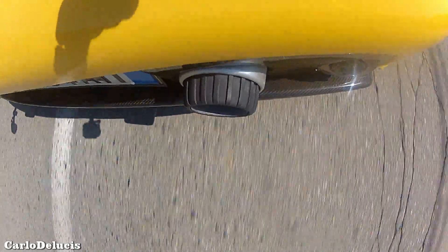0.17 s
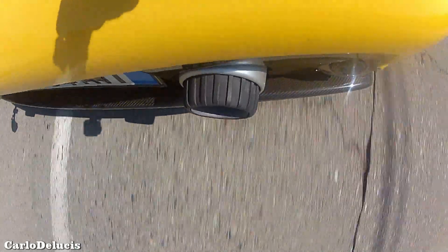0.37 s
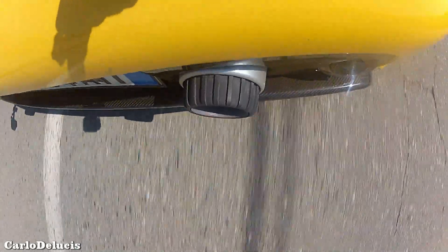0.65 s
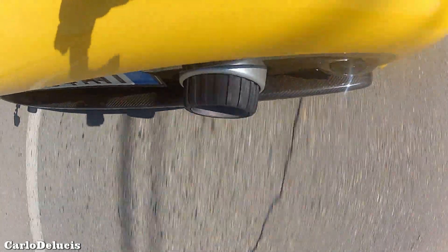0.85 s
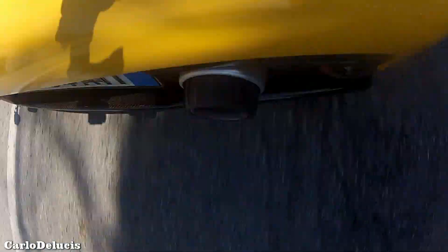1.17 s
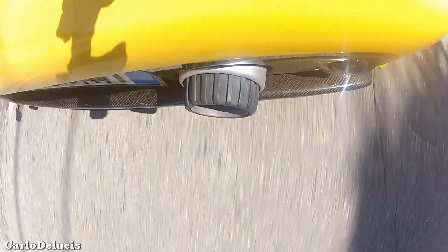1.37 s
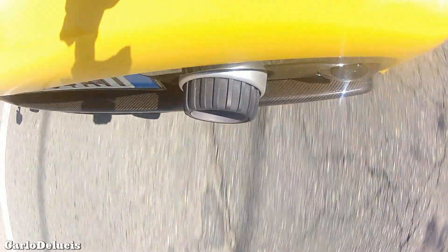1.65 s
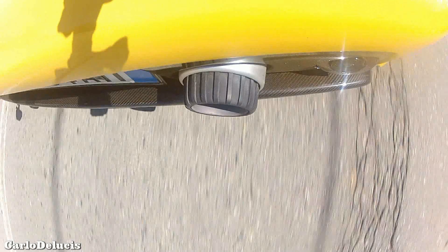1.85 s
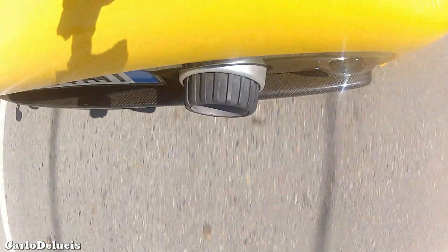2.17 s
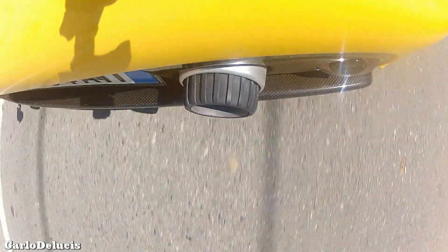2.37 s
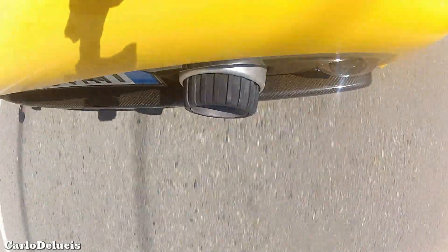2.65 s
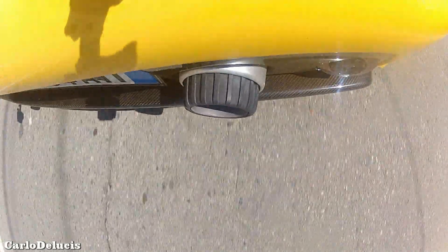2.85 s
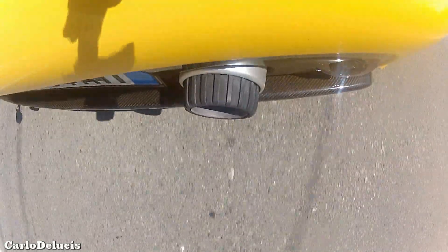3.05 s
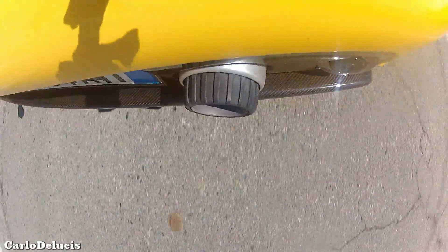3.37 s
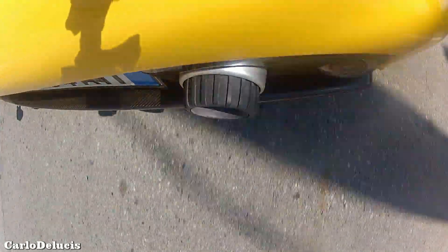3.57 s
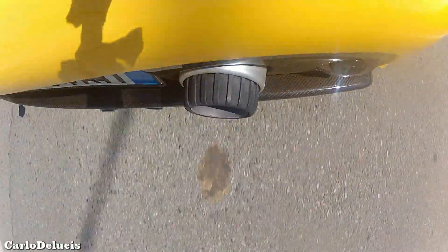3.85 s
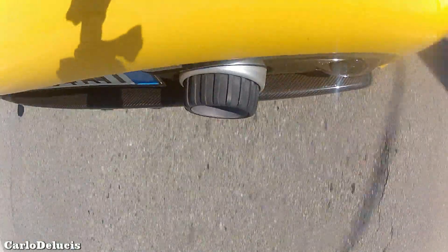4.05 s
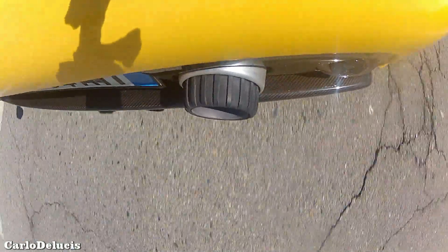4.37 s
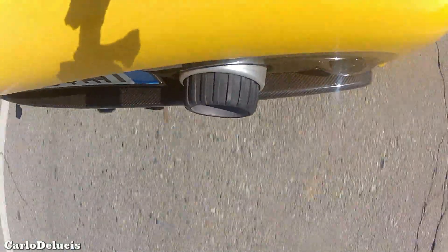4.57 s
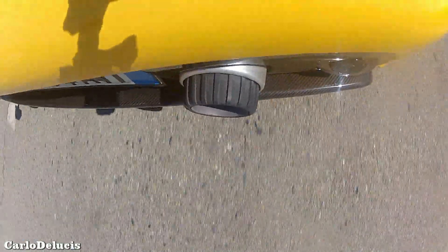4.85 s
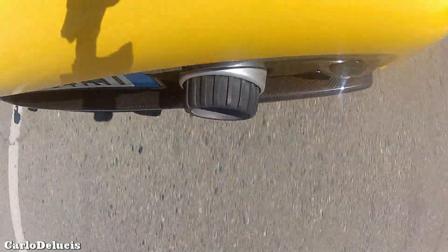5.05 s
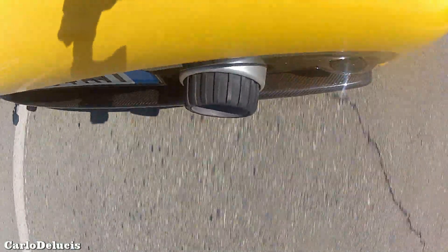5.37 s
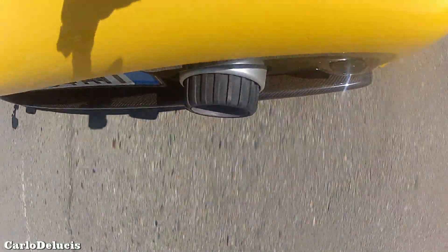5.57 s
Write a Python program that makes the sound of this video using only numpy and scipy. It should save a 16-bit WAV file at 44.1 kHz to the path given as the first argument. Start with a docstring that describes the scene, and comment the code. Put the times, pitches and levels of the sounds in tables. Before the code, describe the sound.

Right above a sports car's tailpipe on an open road, a small overloaded camera microphone catches a high, steady engine howl with brief dips in pitch. The throttle shuts, the note slides down into burbling and heavy pops with wind buffeting, booms in a low drone, then rasps hard and climbs again. Dull highs carry a metallic digital sizzle.

```python
"""Just above the exhaust of a V10 sports car, at a small camera's microphone: the engine pulls at high revs,
winds down, burbles and pops with the throttle shut, drones on a pipe resonance, then rasps and pulls again.
Sine waves tied to the crank make the note; shaped noise makes burble, gas jet and wind.
Pops ring the pipe; decaying sines make low thumps of wind and exhaust at the microphone.
The recorder overloads softly and holds each sample, which adds a metallic sizzle."""
import sys
import numpy as np
from scipy import signal
from scipy.fft import rfft, irfft, next_fast_len
from scipy.io import wavfile
from scipy.ndimage import map_coordinates

SR = 44100
rng = np.random.default_rng(int(sys.argv[2]) if len(sys.argv) > 2 else 0)


def store_wav(level_fs):
    """Save 16-bit WAV to argv[1]."""
    pcm = np.round(np.clip(np.atleast_2d(level_fs), -1, 1) * 32767)
    wavfile.write(sys.argv[1], SR, pcm.T.astype(np.int16))


N = 252252  # length in samples


def amp(db):
    """Turn decibels into a gain."""
    return 10 ** (np.asarray(db) / 20)


def unit(x):
    """Scale to an rms of 1."""
    return x / np.sqrt(np.mean(x ** 2) + 1e-20)


def along(points, hz):
    """Read a table of frequency and value on a logarithmic frequency axis."""
    f, v = np.transpose(points)
    return np.interp(np.log(hz + 1), np.log(f + 1), v)


def curves(rows):
    """Join the rows by straight lines: one value per sample for each column after the time."""
    s, *cols = np.transpose(rows)
    return [np.interp(np.arange(N) / SR, s, c) for c in cols]


def wobble(rate):
    """A smooth random curve with `rate` random points a second."""
    knots = rng.standard_normal(int(N * rate / SR) + 4)
    return map_coordinates(knots, [np.arange(N) * rate / SR])


def filtered(x, response):
    """Multiply the spectrum of x by a response that depends on frequency."""
    m = next_fast_len(N + SR // 2)
    return irfft(rfft(x, m) * response(np.fft.rfftfreq(m, 1 / SR)), m)[:N]


def coloured(x, spectrum):
    """Shape x by a table of frequency and decibels, then scale to an rms of 1."""
    return unit(filtered(x, lambda hz: amp(along(spectrum, hz))))


def ring(spectrum, size=4096):
    """The ringing a sudden kick would give with this spectrum, starting at once, with a peak of 1."""
    cepstrum = irfft(np.log(amp(along(spectrum, np.fft.rfftfreq(size, 1 / SR)))))
    # folding the cepstrum onto its first half puts the energy as early as possible
    cepstrum[1:size // 2] *= 2
    cepstrum[size // 2 + 1:] = 0
    h = irfft(np.exp(rfft(cepstrum)))
    return h / np.abs(h).max()


# how far the throttle is open: time_s, load (0 to 1)
THROTTLE_LOAD = [(0, 0.49), (.28, 0.6), (.37, 0.2), (.46, 0.17), (.51, 0.83), (.92, 0.64), (1.25, 0.78),
                 (1.5, 0.17), (1.9, .05), (2.6, 0.2), (2.85, 0), (2.9, 0.07), (3.95, 0), (4.5, 0.27),
                 (4.7, 0.99)]


def throttle():
    """Throttle opening, from 0 (shut) to 1 (open), which decides how hard the engine works."""
    return np.clip(curves(THROTTLE_LOAD)[0], 0, 1)


# brief drops in the revs, which then catch again: bottom_s, depth_hz, recovery_s
REV_DIPS = [(.06, 15, 0.077), (.82, 27, 0.063), (1.22, 43, .15), (2.235, 17, 0.071)]
DIP_FALL_S = .055  # time to the bottom


def dip():
    """Hz by which the firing rate has dropped: a quick fall and then the recovery."""
    return sum(curves([(s - DIP_FALL_S, 0), (s, depth), (s + recovery, 0)])[0]
               for s, depth, recovery in REV_DIPS)


# engine speed through the first pull, the wind-down and the second pull, before dips: time_s, firing_hz
ENGINE_SPEED = [(0, 371.2), (.15, 375.9), (.33, 369.4), (.47, 383.8), (.56, 401), (1.06, 423.3),
                (1.17, 441.4), (1.37, 428.2), (1.65, 411.8), (1.85, 405.6), (2.18, 393.5), (2.32, 381.3),
                (2.4, 358.4), (2.55, 346.5), (2.84, 298.3), (3.56, 222.2), (3.84, 213.4), (4.02, 204.4),
                (4.41, 200.7), (4.46, 207.5), (4.51, 198.2), (4.85, 217), (5.35, 270.4), (5.44, 282.1),
                (5.54, 288.4), (5.72, 312.4)]


def crank(jitter):
    """Firing rate and firing phase; the crankshaft turns a little unevenly."""
    hz = curves(ENGINE_SPEED)[0] - dip()
    uneven_hz = hz * (1 + jitter * wobble(70))
    return hz, 2 * np.pi * np.cumsum(uneven_hz) / SR


# the pipe as the regular firings drive it: frequency_hz, level_db
PIPE_RESPONSE = [(100, -5), (200, 1), (430, 4), (750, 7), (880, -4.5), (1030, -25), (1200, -23),
                 (1350, -14.5), (1500, -36.5), (1720, -29.5), (1900, -34.5), (2120, -25.5), (2400, -37.5),
                 (3400, -53.5)]
# notes beside the firing note from unequal cylinders: multiple of the firing rate, level_db (re firing note)
UNEQUAL_CYLINDERS = [(.5, -19.5), (.8, -30), (.9, -41), (1.1, -14.5), (1.2, -17.5), (1.9, -24.5),
                     (2.1, -22)]
# a pipe resonance that lifts any overtone gliding through it
SECOND_MODE_HZ, SECOND_MODE_WIDTH_HZ, SECOND_MODE_DB = 458, 30.6, 12
DIP_DB_PER_HZ, DIP_RASP_DB_PER_HZ = 0.1, 0.19  # in a dip the firing note weakens, the upper overtones flare
# at part throttle the two banks differ most and their overtones snarl: load, load width, lift in dB
PART_LOAD, PART_LOAD_WIDTH, PART_LOAD_DB = 0.31, 0.071, 5.5
SHUT_FLUTTER = 2.7  # share by which the overtones flutter more with the throttle shut
WEAK_WAVER = .8  # the weaker the note, the more it breaks up: exponent of that growth


def note(rows, hz, phase, whole_db, throttle_db, bank_db, uneven_db, upper_db, upper_bank_db, flutter_db,
         waver_db, fade_s=0.021):
    """The clean engine note: all ten cylinders make whole multiples of the firing rate, two unequal banks
    make the halves between; the pipe colours these overtones as they glide."""
    t = np.arange(N) / SR
    gate = np.clip(np.minimum(t - rows[0][0], rows[-1][0] - t) / fade_s + 1, 0, 1)
    on = gate > 0
    load = throttle()[on]

    strength_db = curves(rows)[0]
    frailty = np.minimum(amp(WEAK_WAVER * (strength_db.max() - strength_db)), 5)
    waver = waver_db * frailty * wobble(32)
    first_db = (strength_db - DIP_DB_PER_HZ * dip() + waver)[on]

    def line(multiple, db):
        """A sine wave at a multiple of the firing rate, with its rms level in dB."""
        return np.sqrt(2) * amp(db) * np.sin(multiple * phase[on] + rng.uniform(0, 2 * np.pi))

    def pipe_db(f):
        """Colour of the pipe, including its second resonance."""
        distance = (f - SECOND_MODE_HZ) / SECOND_MODE_WIDTH_HZ
        return along(PIPE_RESPONSE, f) + SECOND_MODE_DB / (1 + distance ** 2)

    edge_db = 6 * (load - .5) + DIP_RASP_DB_PER_HZ * dip()[on]  # an open throttle sharpens the pulses
    snarl_db = PART_LOAD_DB * np.exp(-((load - PART_LOAD) / PART_LOAD_WIDTH) ** 2)
    shake_db = flutter_db * (1 + SHUT_FLUTTER * (1 - load))

    out = np.zeros(N)
    out[on] = line(1, first_db)
    for k in np.arange(1, 20) / 2:
        if k == 1:
            continue
        if k % 1 == 0:
            db, lift_db = whole_db + throttle_db * load, upper_db
        else:
            db, lift_db = bank_db, upper_bank_db + snarl_db
        upper_lift_db = (lift_db + edge_db) * (k > 2)
        out[on] += line(k, db + pipe_db(k * hz[on]) + upper_lift_db + shake_db * wobble(60)[on])

    # close neighbours of the firing note and its octave make the note throb
    for k, db in UNEQUAL_CYLINDERS:
        out[on] += line(np.round(k, 1), first_db + db + uneven_db + 2.2 * wobble(11.0)[on])
    return gate * out


# strength of the firing note at high revs: time_s, level_db
HIGH_REVS_LEVEL = [(0, -14.5), (.46, -17), (.51, -14.5), (1.2, -13.5), (1.44, -23.5), (1.6, -16.5),
                   (1.65, -15.5), (2.18, -14), (2.42, -19.5), (2.84, -20.5)]


def high_revs(hz, phase):
    """The first pull and start of the wind-down: opening the throttle strongly lifts the whole multiples."""
    return note(HIGH_REVS_LEVEL, hz, phase, whole_db=-39.0, throttle_db=23, bank_db=-40.5, uneven_db=-7,
                upper_db=-1.0, upper_bank_db=10, flutter_db=0.8, waver_db=0.83)


# pops of unburnt fuel in the pipe: start_s, level_db, crack_db (re the pop),
# swell_db (how far the exhaust builds up beforehand; it sinks where negative)
FUEL_POPS = [(1.325, -3.5, -26, 4), (1.424, -5, -23, -1), (2.204, -16, -25, 2), (2.822, -5.5, -20, -0.5),
             (2.854, 0.5, -39, -4.5), (2.873, -0.5, -26, 7.5), (3.159, -1, -34, 3), (3.333, 1, -37, 3),
             (3.499, 0, -28, 4.5), (3.641, -7, -35, -0.5), (3.712, -2.5, -40, 1.5), (4.783, -4.5, -20, 2),
             (4.869, -14.5, -25, 1.5)]
# build-up to a pop, its collapse, the lull after it, and the lull's depth as a share of the build-up
SWELL_S, COLLAPSE_S, LULL_S, LULL_SHARE = 0.11, 0.015, 0.14, 0.59


def swell():
    """dB by which the exhaust builds up to each pop and slackens after it (the reverse where negative)."""
    total_db = 0
    for s, _, _, db in FUEL_POPS:
        low_s = s + COLLAPSE_S
        total_db += curves([(s - SWELL_S, 0), (s, db), (low_s, -LULL_SHARE * db), (low_s + LULL_S, 0)])[0]
    return total_db


def puffs(phase, depth):
    """Turbulence that swells once with every firing."""
    return rng.standard_normal(N) * (1 + depth * np.cos(phase))


# uneven combustion, before the swell and a 1.5 dB cut: time_s, level_db
BURBLE_LEVEL = [(0, -19), (.2, -28.5), (.48, -23), (.7, -33.5), (1.25, -30.5), (1.52, -21), (1.9, -25),
                (2.3, -20.5), (2.78, -16), (3.1, -16.5), (3.95, -16.5), (4.1, -27), (4.35, -26.5),
                (4.61, -22), (4.7, -13.5), (5.34, -13.5), (5.46, -23.5), (5.72, -23)]
# colour of the burble with the throttle shut: frequency_hz, level_db (per Hz)
SHUT_COLOUR = [(25, -16.5), (44, 5.5), (80, -9.5), (160, -9.5), (195, 4), (225, -5), (320, -9), (440, 1.5),
               (490, -3.5), (550, -13.5), (630, -5.5), (790, -4), (870, -18.5), (980, -30), (1500, -44),
               (3500, -57.5)]
# colour of the burble with the throttle open: frequency_hz, level_db (per Hz)
OPEN_COLOUR = [(50, -28.5), (110, -5.5), (160, -1), (220, -0.5), (280, -1.5), (355, 3.5), (430, -1),
               (490, -6.5), (600, 0), (790, -2), (910, 1), (1000, -20), (1300, -46), (3500, -48)]
CHUG_DB, CHUG_PER_S = 1.0, 45  # the coasting burble comes in irregular clumps


def burble(phase, shut_scatter_db, open_scatter_db):
    """Each firing burns with a different strength and rings the pipe; the throttle blends two colours."""
    firing = (phase / (2 * np.pi) + .5).astype(int)
    strength = rng.standard_normal(N // 20)[firing]
    load = throttle()
    clumps_db = shut_scatter_db * strength + CHUG_DB * wobble(CHUG_PER_S)
    coasting = coloured(puffs(phase, depth=0.42) * amp(clumps_db), SHUT_COLOUR)
    driving = coloured(puffs(phase, depth=0.14) * amp(open_scatter_db * strength), OPEN_COLOUR)
    blend = np.sqrt(1 - load) * coasting + np.sqrt(load) * driving
    return amp(-1.5) * amp(curves(BURBLE_LEVEL)[0] + swell()) * blend


# gas jet at the tailpipe, before the swell: time_s, level_db
JET_LEVEL = [(0, -38), (.3, -41.5), (.72, -31.5), (.88, -43.5), (1.2, -33), (1.42, -45), (1.7, -35.5),
             (2, -36.5), (2.86, -26.5), (2.9, -36.5), (3.6, -40), (4.48, -28), (4.54, -36.5), (4.63, -30),
             (4.72, -24), (5.36, -20.5), (5.47, -38.5), (5.72, -33.5)]
# colour of the jet with the throttle shut: frequency_hz, level_db (per Hz)
SHUT_JET_COLOUR = [(500, -20.5), (1000, -0.5), (1380, -0.5), (1650, -4), (2000, -3), (2500, -4.5),
                   (3000, -9.5), (3700, -8)]
# colour of the jet with the throttle open, also of the cracks in the pops: frequency_hz, level_db (per Hz)
OPEN_JET_COLOUR = [(500, -39), (950, 3), (1080, -1.5), (1340, -5), (1530, 0), (1700, -3), (1830, -5.5),
                   (1980, -1.5), (2350, -11.5), (3250, -11.5), (3600, -13.5)]
SWELL_IN_JET = 0.13  # how far the jet follows the swell


def jet(phase):
    """Gas rasps out of the tailpipe in pulses; on full throttle it rings the pipe's upper resonances."""
    load = throttle()
    shut_flow = puffs(phase, depth=0.12) * amp(1.1 * wobble(150))
    open_flow = puffs(phase, depth=0.1) * amp(0.94 * wobble(150))
    shut_rasp = np.sqrt(1 - load ** 2) * coloured(shut_flow, SHUT_JET_COLOUR)
    open_rasp = load * coloured(open_flow, OPEN_JET_COLOUR)
    return amp(curves(JET_LEVEL)[0] + SWELL_IN_JET * swell()) * (shut_rasp + open_rasp)


# buffeting, before gusts and swell: time_s, level_db
WIND_LEVEL = [(0, -29), (.65, -35), (1.2, -38), (1.55, -29.5), (2.4, -25), (2.75, -14), (2.96, -26.5),
              (3.28, -14.5), (4.02, -18), (4.17, -26), (4.45, -20), (5.72, -38)]
# colour of the buffeting: frequency_hz, level_db (per Hz)
WIND_COLOUR = [(10, -22.5), (24, -11), (42, -5), (65, -4), (110, -7.5), (170, -11.5), (300, -15.5),
               (900, -52.5)]
# brief gusts, and a brief lull where negative: peak_s, level_db (added to the buffeting)
GUSTS_AND_LULL = [(2.21, 18.5), (2.84, 6.5), (3.891, -2.5), (4.33, 10)]
GUST_S = 0.044  # time to reach the full change, and again to return
SWELL_IN_WIND = 1.02  # how far the buffeting follows the swell


def wind():
    """The slipstream and the swelling exhaust hit the microphone in lumps of low noise."""
    lumps = unit(amp(2.6 * wobble(24.938)) * coloured(rng.standard_normal(N), WIND_COLOUR))
    gust_db = sum(curves([(s - GUST_S, 0), (s, db), (s + GUST_S, 0)])[0] for s, db in GUSTS_AND_LULL)
    return amp(curves(WIND_LEVEL)[0] + gust_db + SWELL_IN_WIND * swell()) * lumps


# low thumps of wind and exhaust at the microphone: start_s, level_db (before the soft start),
# pitch_hz (once settled), decay_s (time to fall by 60 dB)
LOW_THUMPS = [(.13, -12, 101, 0.063), (0.502, -13.5, 116, 0.065), (1.75, -13, 105.5, 0.1),
              (2.199, -0.5, 98, 0.09), (2.816, -4, 65.62, 0.13), (3.855, -4.5, 44.96, 0.2)]
THUMP_SAG, THUMP_SAG_S = 0.32, 0.012  # share by which a thump starts above its pitch; settling time constant


def thumps(rise_s):
    """Low thumps of wind and exhaust at the microphone: a few slow cycles that fall in pitch."""
    out = np.zeros(N + SR)
    t = np.arange(SR // 2) / SR
    bent_s = t + THUMP_SAG * THUMP_SAG_S * (1 - np.exp(-t / THUMP_SAG_S))
    for s, db, hz, decay_s in LOW_THUMPS:
        envelope = amp(db - 60 * t / decay_s) * (1 - np.exp(-t / rise_s))
        out[round(s * SR):][:len(t)] += envelope * np.sin(2 * np.pi * hz * bent_s)
    return out[:N]


def pops(crack_decay_s):
    """Each pop is a pressure step that rings the pipe, with a short noisy crack on top."""
    boom = ring(SHUT_COLOUR)
    t = np.arange(len(boom)) / SR
    out = np.zeros(N + len(boom))
    crackle = coloured(rng.standard_normal(N), OPEN_JET_COLOUR)
    for s, db, crack_db, _ in FUEL_POPS:
        i = round(s * SR)
        crack = amp(crack_db - 60 * t / crack_decay_s) * crackle[i:i + len(t)]
        out[i:i + len(t)] += amp(db) * (crack - boom)
    return out[:N]


# strength of the firing note as it sits on the pipe's lowest resonance: time_s, level_db
DRONE_LEVEL = [(3.6, -23.5), (3.84, -20.5), (3.97, -30), (4.07, -6), (4.14, -10), (4.21, -5.5), (4.38, -9),
               (4.42, -19), (4.46, -3.5), (4.54, -7), (4.595, -17), (4.63, -10), (4.665, -10.5),
               (4.71, -24), (4.85, -18.5)]


def drone(hz, phase):
    """The firing rate meets the pipe's lowest resonance, so the firing note booms in bursts."""
    return note(DRONE_LEVEL, hz, phase, whole_db=-37.5, throttle_db=0, bank_db=-38, uneven_db=-9.5,
                upper_db=-5.0, upper_bank_db=-11, flutter_db=0.6, waver_db=.6)


# strength of the firing note in the second pull: time_s, level_db
PULL_LEVEL = [(5.37, -16.5), (5.52, -17.5), (5.72, -15)]


def second_pull(hz, phase):
    """The engine pulls again on an open throttle, with fluttering overtones."""
    return note(PULL_LEVEL, hz, phase, whole_db=-38.0, throttle_db=11.5, bank_db=-35.5, uneven_db=-20,
                upper_db=-0.5, upper_bank_db=1.5, flutter_db=1.9, waver_db=1.2)


def scene():
    """Exhaust, thumps and wind add up at one microphone."""
    hz, phase = crank(jitter=.002)
    notes = high_revs(hz, phase) + drone(hz, phase) + second_pull(hz, phase)
    exhaust = burble(phase, shut_scatter_db=2.0, open_scatter_db=2.0) + jet(phase) + pops(crack_decay_s=0.018)
    mono = notes + exhaust + thumps(rise_s=0.0057) + wind()
    return np.array([mono, mono])


# treble balance after the hold: frequency_hz, level_db
CONVERTER_TREBLE = [(9000, 0.5), (13000, 2.5), (15300, -6)]
HOLD_HZ, TOP_HZ = 8000, 15350  # samples held per second; nothing passes from the top frequency up


def record(dry):
    """Soft overload, then a slow converter that holds each sample and so mirrors the sound around its rate."""
    x = dry[0] / (1 + np.abs(dry[0] / 1.05) ** 8) ** (1 / 8)
    x = filtered(x, lambda hz: 1 / np.sqrt(1 + (hz / 3600) ** 30))  # steep low-pass at 3600 Hz
    slow = signal.resample_poly(x, HOLD_HZ, SR)
    held = np.repeat(slow, 24)  # 24 fine steps draw each stair
    stairs = signal.resample_poly(held, SR, 24 * HOLD_HZ)[:N]
    out = filtered(stairs, lambda hz: amp(along(CONVERTER_TREBLE, hz)) * (hz < TOP_HZ))
    return np.array([out, out])


dry = scene()
out = record(dry)
store_wav(out)
```